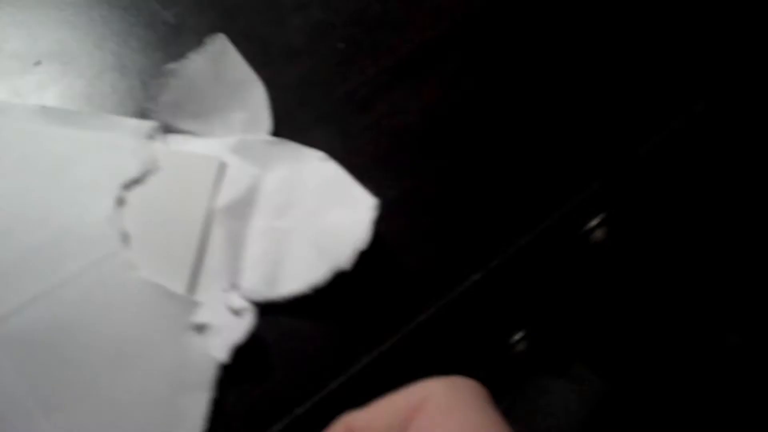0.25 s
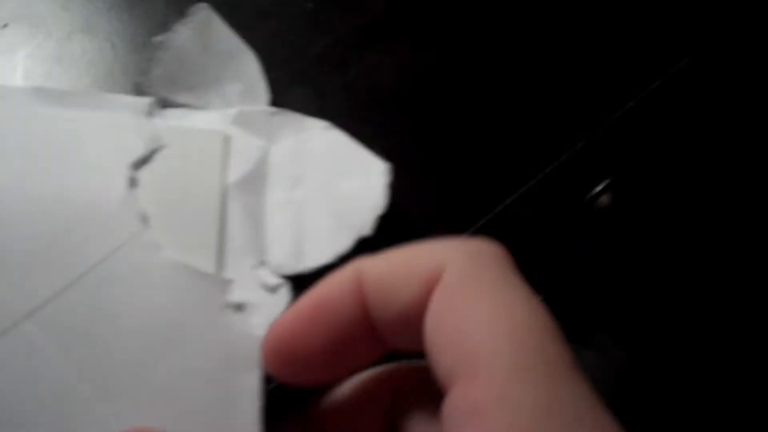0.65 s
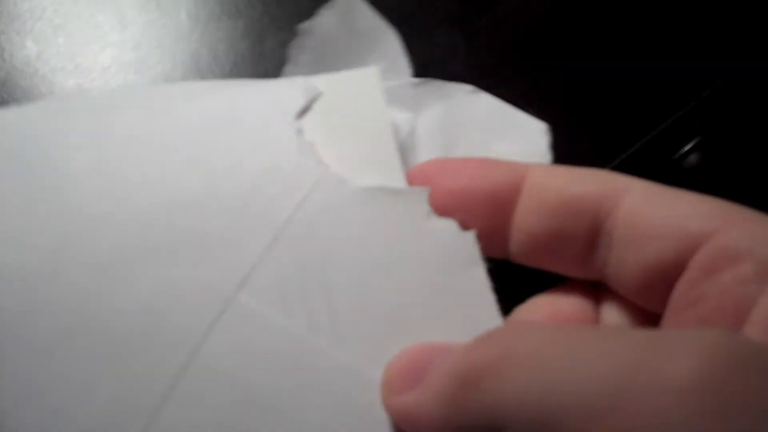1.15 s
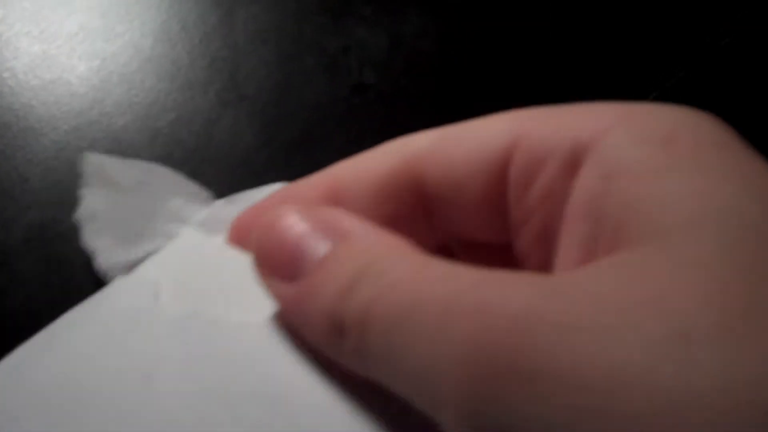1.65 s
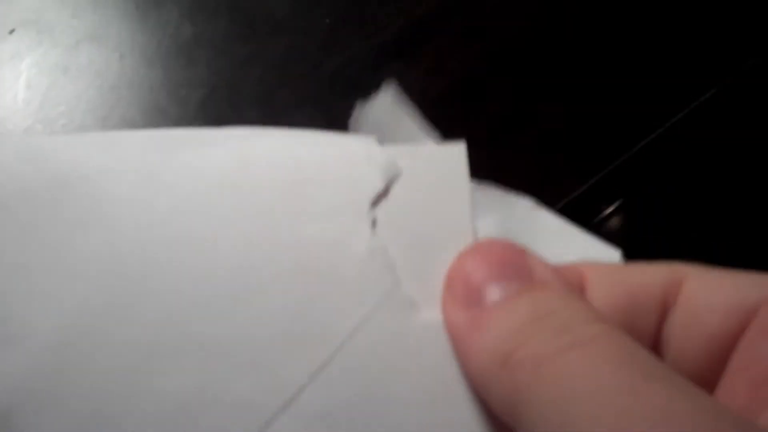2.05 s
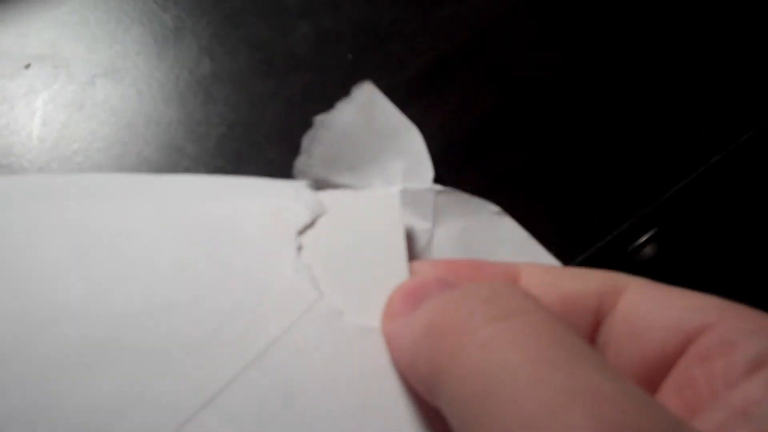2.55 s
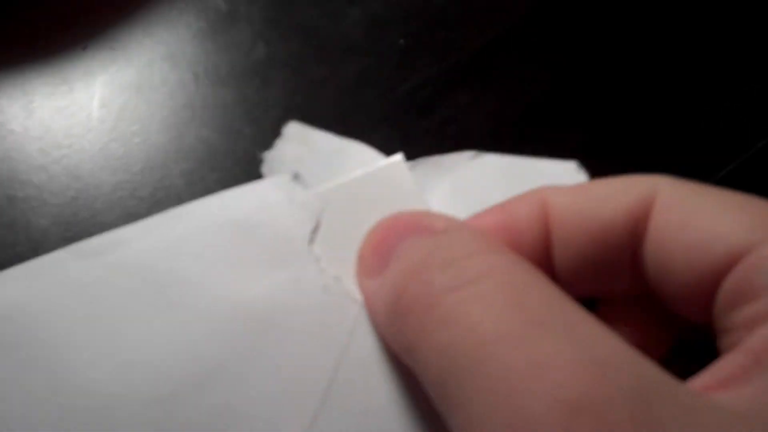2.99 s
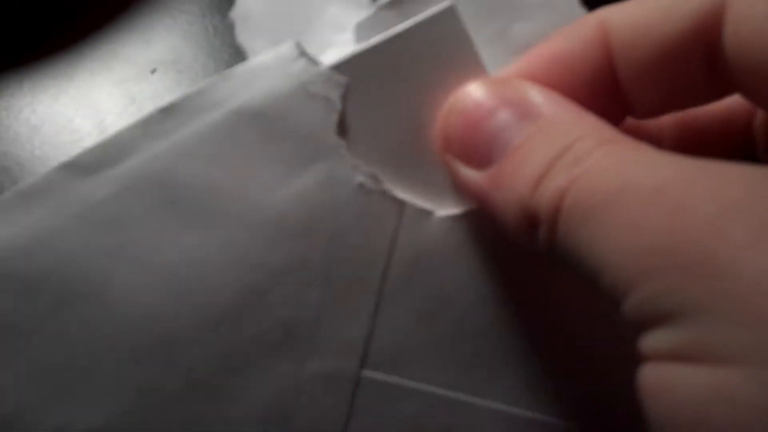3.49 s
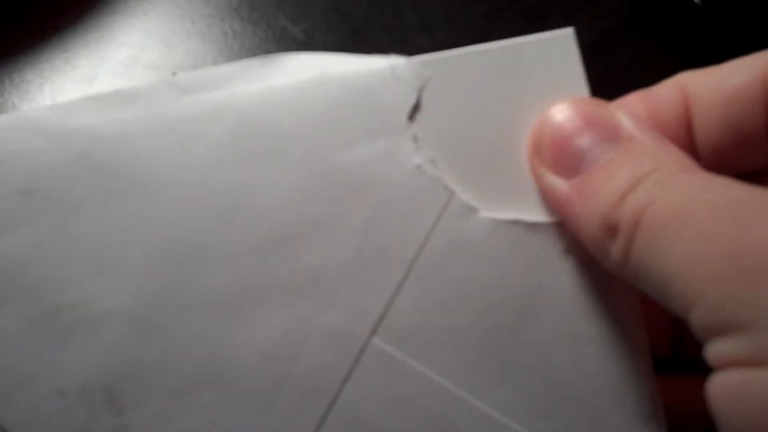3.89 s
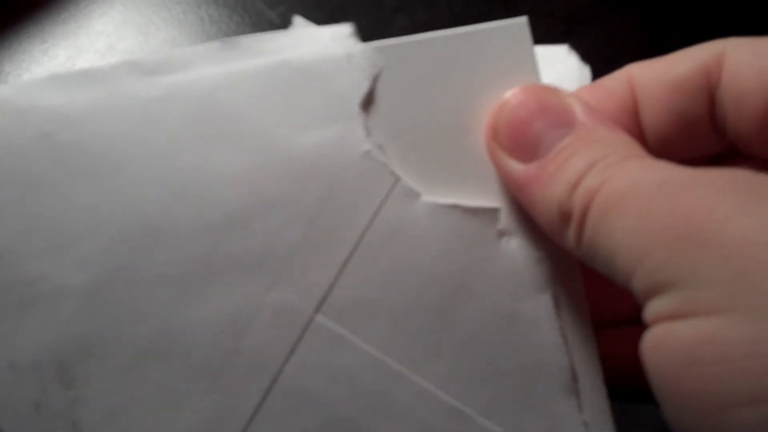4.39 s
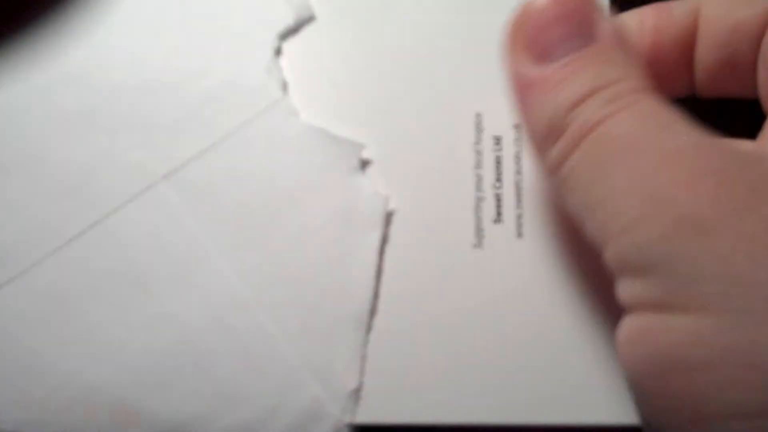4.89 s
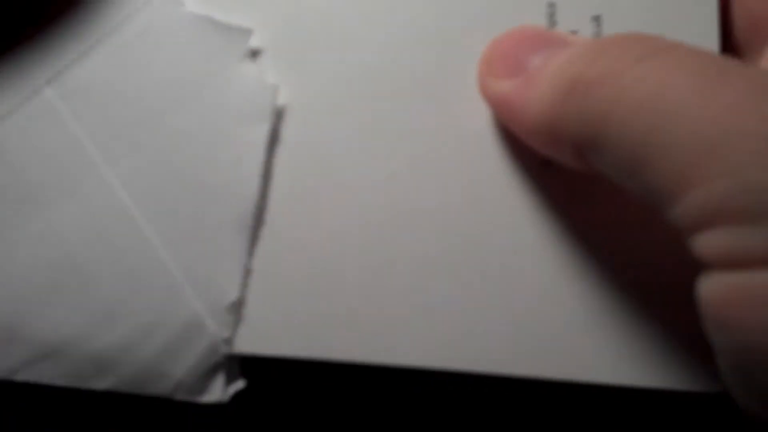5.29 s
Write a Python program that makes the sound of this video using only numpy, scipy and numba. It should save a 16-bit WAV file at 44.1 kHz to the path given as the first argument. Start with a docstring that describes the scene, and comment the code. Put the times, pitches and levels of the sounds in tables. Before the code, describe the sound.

Near-constant crisp paper noise in a quiet, dry room: brief crackles and a light knuckle rap on the table, sharp creases popping, busy rustling and picking, a pair of loud snaps near three seconds, then intermittent rubs and ticks as a stiff card slides from the torn envelope. Close microphone, brighter on the left, duller on the right.

```python
"""A quiet room: fingers pick and tear at a paper envelope and slide a card out of it, close to a small camera.
Fibres part in dense tiny cracks, built as clumped noise impulses; creases snap with a step and a shudder.
Sheet and pocket ring through moving resonances; low papery knocks are filtered noise; the wrist nudges the table.
A knuckle taps the table early on, as decaying sine modes. Rumble and hiss lie beneath.
The left microphone port faces the paper, the right one is shaded and duller."""
import sys
import numpy as np
from scipy import signal
from scipy.fft import rfft, irfft, next_fast_len
from scipy.io import wavfile
from scipy.ndimage import uniform_filter1d, map_coordinates
from numba import njit

SR = 44100
rng = np.random.default_rng(int(sys.argv[2]) if len(sys.argv) > 2 else 0)


def level_to_linear(level):
    """Convert decibel levels to linear amplitude factors, elementwise."""
    exponent = np.asarray(level, float) / 20
    return 10 ** exponent


def wrap_up_sound(samples):
    """Save the sound to the file named by the first command line argument, as 16-bit audio."""
    columns = np.atleast_2d(samples).T
    # keep every value between -1 and 1, then stretch to whole-number steps
    tamed = np.clip(columns, -1, 1)
    steps = np.round(tamed * 32767).astype(np.int16)
    wavfile.write(sys.argv[1], SR, steps)


N = 244314  # length (samples)

# Room noise at the left port: pitch_hz, level_db_per_hz
ROOM_NOISE = [(25, -95.5), (45, -99.5), (90, -101), (300, -106), (370, -99), (450, -107), (1000, -108),
              (3000, -109), (7600, -111), (10000, -115), (14000, -117)]
# Room noise, right port against left: pitch_hz, gain_db
ROOM_NOISE_RIGHT = [(40, -5.5), (200, -6), (5000, 3), (8000, -5), (14000, -1.5)]
# The wrist nudges the table: start_s, level_db
WRIST_NUDGES = [(1.549, -50), (1.598, -62), (1.669, -55), (2.086, -63), (2.218, -68), (2.971, -59),
                (3.2, -58), (3.229, -61), (3.279, -66), (5.2, -61)]
# A knuckle on the table: start_s, level_db, hardness_db_per_octave
KNUCKLE_TAPS = [(0.134, -42.5, 3), (.22, -45, -6), (0.2241, -40, 3), (0.2375, -33, 3), (0.259, -63, -6),
                (0.284, -55, -5)]
# Ringing modes of the table top: pitch_hz, level_db, t60_s
TABLE_MODES = [(150, -11, 0.031), (305, 0, 0.018), (434, 10, 0.0099), (429, -2, 0.1), (473.5, -4.5, 0.11),
               (623, -6, 0.019), (860, -13, 0.068), (1170, -4, 0.0093), (1600, -12, 0.0087)]
# Low papery knocks: flicks near 0.33 s, low bodies of some snaps, crumples:
# start_s, pitch_hz, level_db, length_ms
LOW_PAPER_KNOCKS = [(0.331, 1250, -52.5, 4), (0.3381, 480, -53, 6.1), (.3392, 1190, -52, 2.4),
                    (1.034, 624, -54, 6.8), (1.0357, 1410, -37, 6.2), (1.203, 490, -63, 6.7),
                    (3.199, 454, -55, 8.7), (1.585, 1310, -55, 36), (1.618, 675, -66, 13),
                    (1.655, 410, -60.5, 23), (1.668, 616, -60, 9.5), (1.722, 507, -64, 28),
                    (2.3, 720, -64.5, 140), (3.284, 865, -48, 5), (3.331, 930, -58.5, 16),
                    (3.345, 860, -54, 32), (3.351, 1330, -51.5, 19), (3.455, 890, -50.5, 5),
                    (3.755, 487, -53.5, 6.7), (3.83, 835, -68, 27), (5.082, 755, -60, 11),
                    (5.403, 1100, -66, 11)]
# Strokes of the fingers, each a swell of cracks:
# peak_s, fibre_crackle_db, rise_ms, fall_ms, sheet_rustle_re_crackle_db
FINGER_STROKES = [(0, -47.5, 50, 70, -13.5), (0.042, -36, 10, 83, -15.5), (.152, -46, 19, 43, -16),
                  (0.235, -48.5, 240, 112, -14), (0.346, -50.5, 560, 8.5, -19), (0.473, -53.5, 4, 170, -13),
                  (.515, -56, 38, 130, -16), (.642, -45.5, 82, 180, -17.5), (.701, -44, 28, 120, -13.5),
                  (.769, -46.5, 75, 54, -12.5), (.84, -42.5, 18, 85, -32), (.88, -41.5, 55, 79, -31),
                  (0.899, -32, 20, 48, -22), (1.001, -53.5, 660, 100, -12.5), (1.039, -40, 33, 75, -14),
                  (1.131, -42, 44, 290, -12), (1.201, -34, 58, 42, -48), (1.265, -40.5, 87, 200, -20.5),
                  (1.325, -40, 390, 140, -19), (1.47, -42, 360, 240, -17), (1.544, -35, 48, 110, -17),
                  (1.6, -38.5, 58, 150, -14), (1.655, -34, 130, 47, -27), (1.72, -41.5, 83, 210, -26),
                  (1.833, -42, 68, 85, -8.5), (1.88, -38, 155, 110, -15), (1.93, -49.5, 83, 200, -16),
                  (2.09, -40.5, 340, 470, -15), (2.29, -38.5, 70, 235, -13), (2.45, -46.5, 280, 490, -32.5),
                  (2.59, -42, 186, 167, -3.5), (2.72, -49, 180, 180, -7.5), (2.812, -41.5, 89, 350, -9.5),
                  (2.956, -27, 48, 64, -19.5), (2.968, -31, 34, 34, -10.5), (3.029, -44.5, 97, 97, -15),
                  (3.152, -44.5, 71, 320, -10), (3.199, -36, 11, 94, -6.5), (3.24, -31.5, 65, 96, -40),
                  (3.356, -40.5, 89, 87, -13), (3.392, -45.5, 37, 34, -7), (3.454, -43.5, 64, 53, -7.5),
                  (3.579, -38.5, 83, 72, -8.5), (3.62, -33.5, 110, 23, -21.5), (3.645, -55, 27, 400, -8.5),
                  (3.76, -38, 99, 156, -11.5), (3.82, -48.5, 110, 380, -8.5), (4.005, -42, 27, 114, -17),
                  (4.051, -34.5, 73, 25.5, -11), (4.08, -61, 30, 87, -21), (4.147, -42, 15, 47, -11.5),
                  (4.224, -43, 60, 50, -9.5), (4.271, -54.5, 38, 66, -18), (4.333, -57.5, 6, 32, -12),
                  (4.341, -50.5, 36, 8.5, -10.5), (4.38, -64.5, 160, 330, -0.5),
                  (4.431, -33.5, 3.7, 34, -29), (4.442, -35, 30, 17, -12.5), (4.461, -48, 30, 26, -5.5),
                  (4.574, -37.5, 110, 300, -14), (4.798, -46.5, 600, 197, -17),
                  (4.955, -41, 9.6, 55, -11.5), (5.077, -42, 95, 113, -14.5), (5.139, -37.5, 10, 59, -10.5),
                  (5.162, -40.5, 28, 140, -14.5), (5.29, -46.5, 420, 160, -14),
                  (5.347, -38.5, 8.3, 27, -18.5), (5.406, -38, 10.4, 30, -7), (5.5, -56.5, 340, 280, -13.5)]
# The held sheet and the pocket between card and envelope ring at pitches that follow the grip:
# time_s, sheet_hz, pocket_hz, crease_rustle_db, flexing_db, sheet_ring_db, pocket_ring_db
# (rustle and flexing for a middling stroke)
GRIP_CHANGES = [(0, 1840, 4680, -54, -74, -12, 3), (.3, 1470, 4930, -57.5, -59, -21, 6.5),
                (.55, 2050, 4260, -48.5, -65.5, -29, -30), (.9, 2010, 4500, -47.5, -69, -17, -22),
                (1.04, 1950, 3320, -45, -68, -2, -20), (1.2, 1910, 3450, -52.5, -70.5, -13.5, -2.5),
                (1.4, 2040, 4700, -52, -74.5, -23, -17), (1.62, 1930, 5500, -41.5, -59.5, -29, -7),
                (1.73, 2090, 4500, -42, -68.5, -24, -18), (1.86, 1910, 5270, -47, -66.5, -5, -30),
                (2.0, 1800, 5000, -43.5, -72, -4, -19), (2.1, 1840, 4770, -46, -67, -2.5, -15),
                (2.2, 1810, 4700, -55, -68, -18, -21.5), (2.4, 1970, 4700, -47.5, -70, -28, -16),
                (2.55, 1870, 4100, -50.5, -73.5, -14, -28), (2.7, 1790, 4100, -52.5, -73, -12, -11),
                (2.87, 2060, 4730, -50, -70.5, -21, -29), (2.955, 1960, 4440, -44, -69, -6, 1),
                (3.05, 2030, 4440, -47.5, -69.5, -22, -24), (3.2, 1810, 4300, -50.5, -67, -6.5, -14),
                (3.3, 1630, 3760, -42, -66, -2, -15), (3.36, 1520, 4300, -46, -68.5, -2, -10.5),
                (3.46, 1680, 4140, -40.5, -68.5, -6.5, -14), (3.58, 1690, 3580, -48, -68, -9.5, -9),
                (3.7, 1740, 3650, -44.5, -70, -12, -5), (3.82, 1670, 4300, -54, -68, -14.5, -5),
                (3.95, 1600, 3900, -48, -76, -4, -10), (4.05, 1600, 3670, -50, -69, -7.5, 3),
                (4.15, 1600, 3970, -50.5, -72, -8, 0), (4.23, 1660, 4400, -50.5, -73.5, -5.5, 3),
                (4.35, 1530, 4330, -46.5, -69, -9, -21), (4.46, 1630, 4640, -48.5, -73.5, -6.5, -9.5),
                (4.7, 1610, 4950, -53.5, -72, -9.5, 2.5), (5.03, 1600, 4040, -54.5, -68, -8, -4),
                (5.15, 1600, 3750, -53, -66.5, -10.5, -0.5), (5.31, 1500, 4670, -50, -68.5, -6.5, -28),
                (5.41, 1240, 3630, -46, -64.5, -1, -7.5), (5.54, 1600, 4200, -53, -66, -9, -24)]
# Creases letting go: start_s, level_db, strongest_octaves_under_fibre_band, fall_from_there_db_per_octave
CREASE_SNAPS = [(0.072, -39.5, 3.5, 3.5), (0.122, -43, 1.5, 5), (0.1532, -22, -0.6, 11),
                (0.155, -20, -0.58, 11), (0.1604, -26.5, -0.1, 15), (0.1946, -21, -0.16, 10.5),
                (0.2361, -21.5, -0.15, 23), (0.245, -27, 0, 21), (.252, -23.5, 0, 26),
                (0.266, -25.5, 0, 24), (0.287, -30, -0.5, 16), (.2955, -32, -0.5, 18),
                (0.4705, -35.5, 0, 7), (0.4958, -37, 0.5, 5.5), (0.6998, -21.5, 0, 17),
                (0.711, -17, -0.57, 14), (.8355, -26, -0.6, 12), (0.8992, -16, -0.5, 11),
                (.906, -22, 0.57, 20), (1.0355, -20.5, 0.5, 2.5), (1.0398, -33, 2, 2.5),
                (1.121, -43.5, 1, -0.5), (1.1687, -30.5, 1, 7), (1.2032, -10.5, 1.4, 9.5),
                (1.512, -33, 0, 6), (1.5485, -26, 0, 4), (1.588, -31, 0.5, 8), (1.6575, -21, 0.5, 12),
                (1.8103, -28, 0.6, 15), (1.8334, -25, 0.8, 5), (1.8575, -32, 1, 7), (1.93, -35, -1.5, 5),
                (1.9737, -27, 0.4, 14), (2.124, -31, 0.5, 16), (2.4099, -49.5, 0, 3),
                (2.851, -13, -0.5, 19), (2.857, -18, 0, 24), (2.9784, -17, 0.34, 5), (2.981, -8, 0.31, 16),
                (2.9823, -7.5, 0.34, 16), (3.1973, -24.5, 1, 4), (3.2024, -24, 1, 4),
                (3.284, -19.5, 0.7, 5), (3.2918, -27, 0.5, 5.5), (3.361, -48, 3, 11), (3.4457, -29, 1, 16),
                (3.457, -21.5, 0.63, 20), (3.548, -43, -1, 4.5), (3.7567, -24.5, -0.5, 3.5),
                (3.807, -28, 1.4, 21), (3.817, -26, -1, 7), (3.826, -27, 0.5, 10), (3.837, -29, -0.45, 6),
                (3.949, -31.5, 0.5, 10), (3.987, -40, 1.1, 7), (4.035, -24.5, 0.16, 10.5),
                (4.043, -27, 0.5, 5.5), (4.0485, -26.5, 0, 4.5), (4.053, -25, -1, 12),
                (4.062, -25, 0.34, 7), (4.145, -46, 2.8, 9), (4.464, -32, 0.6, 12), (4.932, -41, 0, 7),
                (4.954, -23.5, -0.47, 6.5), (5.0273, -36, 0.5, 8), (5.084, -42.5, 2, 3),
                (5.138, -23.5, 0.43, 14), (5.301, -46, 5, 2), (5.348, -48, -5, 21), (5.401, -30, -0.3, 4.5),
                (5.406, -38, 2, 19)]
# Gain on the top of the fibre rustle: time_s, gain_db
RUSTLE_TREBLE = [(0, 2), (.8, 5), (1.2, 0), (2.4, 0), (3, -1.5), (3.9, -2), (4.4, -1.5), (5.54, -1.5)]
# Bands of the four grain sizes, fibre, crease, sheet, flexing: low_hz, high_hz
GRAIN_BANDS = [(5500, 16000), (2700, 5500), (1000, 2700), (120, 1000)]
# How much slower each grain size swells and fades (times), in the same order
GRAIN_LINGER = [1, 1.1, 1.3, 1.9]
# Colour of the paper at the left port, then the right: pitch_hz, relative_level_db_per_hz
LEFT_PORT = [(100, -32), (1000, -25), (1450, -17.5), (1850, -11.5), (2250, -9), (2750, -12.5),
             (3400, -11.5), (4500, -10.5), (5500, -8), (6500, -4), (7600, 2), (8500, -4), (9500, -13),
             (11200, -20), (14200, -19.5)]
RIGHT_PORT = [(100, -43.5), (1000, -34.5), (1800, -25), (2500, -20.5), (3400, -18.5), (4800, -15.5),
              (5700, -12), (6500, -8), (7100, -10), (8200, -25.5), (10000, -33), (12000, -51),
              (14200, -54.5)]
# Likeness of the rustle at the two ports: pitch_hz, likeness (0 to 1)
PORT_LIKENESS = [(200, 0.65), (800, 0.8), (1900, 0.71), (2700, 0.51), (3400, 0.68), (4500, 0.38),
                 (6000, 0.23), (9000, 0.043), (14000, .05)]

FINEST_HZ = 10100  # above this only the finest fibres sound in a snap
M = next_fast_len(N + 8192)  # transform length with room for tails (samples)
HZ = np.fft.rfftfreq(M, 1 / SR)


def along(points, hz):
    """Reads a curve of (pitch, value) points on a log pitch axis."""
    f, v = np.transpose(points)
    return np.interp(np.log(hz + 1), np.log(f + 1), v)


def curves(rows):
    """One value per sample for each column after the time."""
    s, *columns = np.transpose(rows)
    return np.array([np.interp(np.arange(N) / SR, s, column) for column in columns])


def causal(db):
    """Minimum-phase response with the given gain, so nothing sounds before its cause."""
    cepstrum = irfft(db * np.log(10) / 20, M)
    cepstrum[1:M // 2] *= 2
    cepstrum[M // 2 + 1:] = 0
    return np.exp(rfft(cepstrum))


def band_db(low_hz, high_hz):
    """Gain of a band whose two edges are 3 dB down, for power-complementary neighbours."""
    return -10 * np.log10((1 + (low_hz / (HZ + 1)) ** 8) * (1 + (HZ / high_hz) ** 8))


def wobble(rate):
    """A smooth random curve, rate knots a second."""
    knots = rng.standard_normal(int(N * rate / SR) + 4)
    return map_coordinates(knots, [np.arange(N) * rate / SR])


def room():
    """Room rumble and microphone hiss: shaped noise, mostly unrelated between the ports."""
    white = rfft(rng.standard_normal((2, M)))
    a, b = white * level_to_linear(along(ROOM_NOISE, HZ)) * np.sqrt(SR / 2)
    right = (0.2 * a + b) * level_to_linear(along(ROOM_NOISE_RIGHT, HZ))
    return irfft([a, right], M)[:, :N]


def thuds():
    """A dull push with no ring: a puff of low noise, partly different at each port."""
    out, t = np.zeros((2, N + SR)), np.arange(SR // 8) / SR
    low = signal.butter(2, [60, 200], "band", fs=SR, output="sos")
    bursts = rng.standard_normal((len(WRIST_NUDGES), 2, len(t)))
    for (s, level_db), (a, b) in zip(WRIST_NUDGES, bursts):
        fading = np.array([a, 0.74 * a + 0.77 * b]) * level_to_linear(-60 * t / 0.09)
        puff = signal.sosfilt(low, fading)
        out[:, round(s * SR):][:, :len(t)] += level_to_linear(level_db) * puff / np.abs(puff).max()
    return out[:, :N] * level_to_linear([[4], [-2]])


def taps():
    """Taps ring the table's modes in uneven strengths; harder ones reach the higher modes."""
    out, t = np.zeros(N + SR), np.arange(SR // 8) / SR
    unevenness_db = rng.normal(0, 2.0, (len(KNUCKLE_TAPS), len(TABLE_MODES)))
    for (s, tap_db, hard_db), luck in zip(KNUCKLE_TAPS, unevenness_db):
        ring = np.zeros(len(t))
        for (hz, mode_db, t60), luck_db in zip(TABLE_MODES, luck):
            start_db = mode_db + luck_db + hard_db * np.log2(hz / 450)
            ring += level_to_linear(start_db - 60 * t / t60) * np.sin(2 * np.pi * hz * t)
        soft_start = 1 - np.exp(-t / 0.00056)
        out[round(s * SR):][:len(t)] += level_to_linear(tap_db - 7.0) * ring * soft_start
    # remove the slow offset that the soft-started modes leave
    centred = signal.sosfilt(signal.butter(2, 130, "high", fs=SR, output="sos"), out[:N])
    return centred * level_to_linear([[3], [-4]])


def low_paper_knocks():
    """Short bursts of noise ring a broad low resonance, each set by its listed level, nearly alike at both ports."""
    spread = 0.4  # widens the resonance to pitch / 1.4 .. pitch * 1.4
    out, t = np.zeros((2, N + SR)), np.arange(SR // 6) / SR
    noises = rng.standard_normal((len(LOW_PAPER_KNOCKS), 3, len(t)))
    for (s, hz, level_db, length_ms), (a, b, size) in zip(LOW_PAPER_KNOCKS, noises):
        u = 1000 * t / length_ms  # 0 at the start, 1 at the end
        envelope = np.sin(np.pi * np.minimum(u, 1)) ** 0.19
        burst = np.array([a, 0.86 * a + 0.21 * b]) * level_to_linear(2.2 * size) * envelope
        edges_hz = [hz / (1 + spread), hz * (1 + spread)]
        knock = signal.sosfilt(signal.butter(2, edges_hz, "band", fs=SR, output="sos"), burst)
        out[:, round(s * SR):][:, :len(t)] += level_to_linear(level_db) * knock / knock[0, u < 1].std()
    return out[:, :N] * level_to_linear([[3], [-5]])


def cracks(per_s, spread_db, clumps):
    """Two unrelated streams of tiny cracks with the same timing and sizes, rms 1."""
    chance = rng.random(N) < per_s / SR
    sizes = level_to_linear(spread_db * rng.exponential(size=N)) * chance * clumps
    pair = sizes * rng.standard_normal((2, N))
    return pair / np.sqrt(np.mean(pair ** 2))


def patchy(x, depth_db, broad_db):
    """The bent sheet favours other narrow modes, and other broad regions, from moment to moment."""
    z = signal.stft(x, nperseg=512)[2]

    def drift(bins):
        over_pitch = uniform_filter1d(rng.standard_normal(z.shape[1:]), size=bins, axis=0)
        smooth = uniform_filter1d(over_pitch, size=8, axis=1)
        return smooth / smooth.std()

    gain_db = depth_db * drift(3) + broad_db * drift(30)
    return signal.istft(z * level_to_linear(gain_db), nperseg=512)[1][:, :N]


def handling():
    """Level of each grain size: strokes swell and fade evenly in dB under a rounded top, and add in power."""
    usual_db, usual_sheet_db = -42, -14  # a middling stroke
    crease_grows, flex_grows = 0.83, 0.57  # dB per dB of fibre crackle
    crease_follows, flex_follows = 0.46, 0.59  # dB per dB of sheet rustle
    s, fibre_db, rise_ms, fall_ms, sheet_db = np.transpose(FINGER_STROKES)[..., None]
    step = np.arange(0, N, 32)  # levels are worked out every 32 samples
    ms = 1000 * (step / SR - s)
    u = np.where(ms < 0, -ms / rise_ms, ms / fall_ms)  # distance from the peak in rise or fall times
    away_db = 25.5 * u * u / (u + 0.06)  # 0.06 rounds the top
    force_db, coarse_db = fibre_db - usual_db, sheet_db - usual_sheet_db
    peaks = [fibre_db,
             crease_grows * force_db + crease_follows * coarse_db,
             fibre_db + sheet_db,
             flex_grows * force_db + flex_follows * coarse_db]
    gains = [np.sqrt(np.sum(level_to_linear(db - away_db / slow) ** 2, axis=0)) for db, slow in zip(peaks, GRAIN_LINGER)]
    smooth = np.array([np.interp(np.arange(N), step, gain) for gain in gains])
    crease_db, flex_db = curves(GRIP_CHANGES)[2:4]
    unchanged = np.zeros(N)
    return smooth * level_to_linear(np.array([unchanged, crease_db, unchanged, flex_db]))


def rustle():
    """Slipping and tearing: cracks come in clumps, partly shared by all grain sizes."""
    shared = 0.62 * wobble(40) + 0.68 * wobble(300)  # dB
    fibre = cracks(9000, 0.87, level_to_linear(shared + 0.8 * wobble(25.08)))
    fibre = patchy(fibre, depth_db=1.5, broad_db=1.5)
    crease = cracks(14000, 1.07, level_to_linear(shared + 2.1 * wobble(30)))
    crease = patchy(crease, depth_db=2.5, broad_db=1.0)
    sheet = cracks(8000, 0.38, level_to_linear(shared + 1.73 * wobble(40)))
    sheet = patchy(sheet, depth_db=2.0, broad_db=-0.8)
    flexing = cracks(4000, 2.5, level_to_linear(2.1 * shared + 0.27 * wobble(23)))
    flexing = patchy(flexing, depth_db=3.0, broad_db=0.76)
    # single fibres, heard at all sizes at once
    ticks = cracks(250, 3.0, level_to_linear(2.5 * wobble(20)))
    ticks = ticks * level_to_linear([-16.5, -20, -17, -28])[:, None, None]
    top = signal.sosfiltfilt(signal.butter(3, FINEST_HZ, "high", fs=SR, output="sos"), fibre)
    fibre = fibre + (level_to_linear(curves(RUSTLE_TREBLE)[0]) - 1) * top
    return (np.array([fibre, crease, sheet, flexing]) + ticks) * handling()[:, None]


def snaps():
    """A buckling crease lets go at once: a step, strongest in some grain sizes, and a short shudder."""
    # each list: fibre, crease, sheet, flexing, finest fibres
    octaves_under = np.array([0, 0.98, 2, 4, -0.8])
    size_db = np.array([0, 0, 0, -10, -8])  # a snap hardly bends the whole sheet
    t60_s = 0.012 * np.array([[1], [1.2], [1.5], [2.5], [0.7]])
    step_gain = np.array([2.16, 3.56, 5.45, 5.3, 1.24])
    out, t = np.zeros((5, 2, N + SR)), np.arange(SR // 16) / SR
    bursts = rng.standard_normal((len(CREASE_SNAPS), 2, len(t)))
    for (s, level_db, centre, fall_db), burst in zip(CREASE_SNAPS, bursts):
        db = level_db - fall_db * np.abs(octaves_under - centre) + size_db
        shape = level_to_linear(db[:, None] - 60 * t / t60_s) * (1 - np.exp(-t / 0.00037))
        even = burst / burst[:, :SR // 700].std(axis=1, keepdims=True)  # same strength at every onset
        start = round(s * SR)
        out[:, :, start:][..., :len(t)] += 0.68 * shape[:, None] * even
        step = np.sign(burst[0, 0]) * step_gain * level_to_linear(db)
        out[:, :, start + 8] += step[:, None]  # alike at both ports
    low = signal.butter(4, FINEST_HZ, "low", fs=SR, output="sos")
    high = signal.butter(4, FINEST_HZ, "high", fs=SR, output="sos")
    out[0] = signal.sosfilt(low, out[0]) + signal.sosfilt(high, out[4])
    return out[:4, :, :N]


@njit
def resonate(x, turn, pole):
    """Two-pole resonance whose centre moves; its gain does not follow the centre."""
    y = np.zeros_like(x)
    for c in range(2):
        for n in range(2, x.shape[1]):
            fed = np.sin(turn[n]) * x[c, n]
            y[c, n] = fed + 2 * pole * np.cos(turn[n]) * y[c, n - 1] - pole * pole * y[c, n - 2]
    return y * np.sqrt(2 * (1 - pole * pole))


def ringing(x, hz, width_hz, ring_db):
    """The grains plus what they set ringing; a stronger ring drains the rest of the band."""
    drain, usual_ring_db = 0.27, -11  # dB lost beside the ring per dB that it gains over the usual
    ring = resonate(x, 2 * np.pi * hz / SR, np.exp(-np.pi * width_hz / SR))
    return level_to_linear(-drain * (ring_db - usual_ring_db)) * x + level_to_linear(ring_db) * ring


def paper():
    """Each grain size passes its band and both ports; the right hears it slightly sooner, partly from elsewhere."""
    left, right = causal(along(LEFT_PORT, HZ)), causal(along(RIGHT_PORT, HZ))
    alike = np.clip(along(PORT_LIKENESS, HZ), 0, 1)
    unlike = np.sqrt(1 - alike ** 2)
    sooner = np.exp(2j * np.pi * HZ * 0.00004)  # 40 microseconds
    sudden = snaps()
    # creases and sheet take part of a snap through their ring and part dry
    grains = rustle() + sudden * np.array([1, 0.58, 0.58, 1])[:, None, None]
    sheet_hz, pocket_hz, _, _, sheet_db, pocket_db = curves(GRIP_CHANGES)
    grains[1] = 0.54 * ringing(grains[1], pocket_hz, width_hz=700, ring_db=pocket_db)
    grains[2] = 0.58 * ringing(grains[2], sheet_hz, width_hz=340, ring_db=sheet_db)
    grains[1:3] += 0.25 * sudden[1:3]
    total = np.zeros((2, len(HZ)), complex)
    for (low_hz, high_hz), (near, other) in zip(GRAIN_BANDS, rfft(grains, M)):
        band = causal(band_db(low_hz, high_hz))
        # even out the bands by their power in the mean of both ports
        port_power = np.abs(left + alike * right) ** 2 + unlike ** 2 * np.abs(right) ** 2
        centre_power = np.abs(band) ** 2 * port_power / 4
        band /= np.sqrt(centre_power.mean())
        at_right = right * sooner * (alike * near + unlike * other)
        total += band * [left * near, at_right]
    return irfft(total, M)[:, :N]


def scene():
    """Room, table and paper together."""
    return room() + thuds() + taps() + low_paper_knocks() + paper()


def roll_off(x):
    """The treble ends steeply here."""
    return signal.sosfilt(signal.butter(12, 15540, fs=SR, output="sos"), x)


def record(dry):
    """The finished mix has next to nothing above a steep band limit."""
    limit_hz = 14180
    finished = irfft(rfft(dry, M) / (1 + (HZ / limit_hz) ** 400), M)[:, :N]
    return roll_off(finished)


dry = scene()
out = record(dry)
wrap_up_sound(out)
```